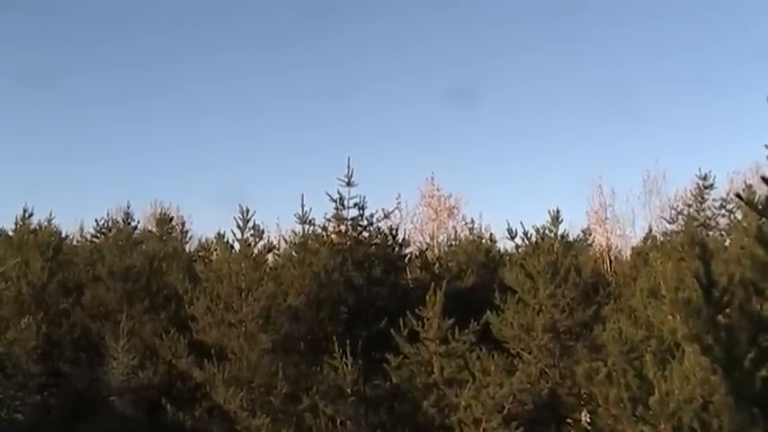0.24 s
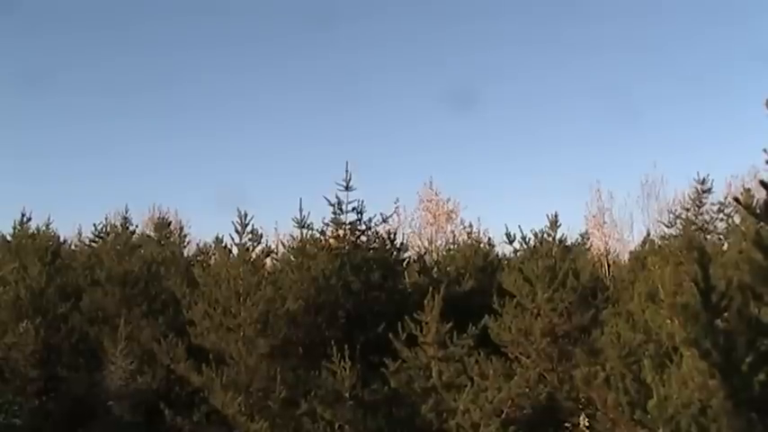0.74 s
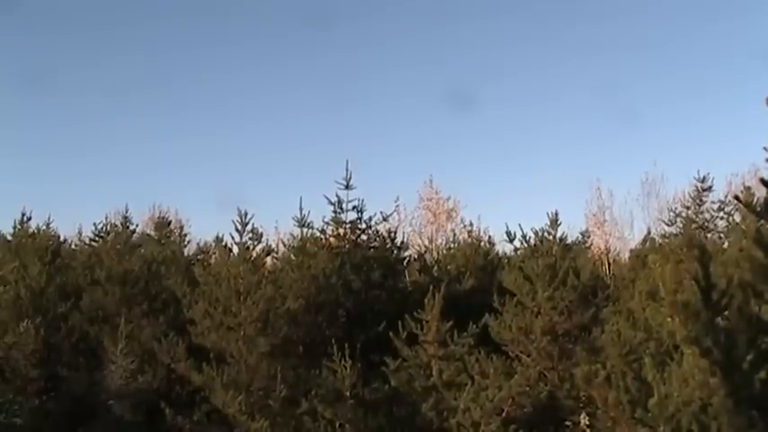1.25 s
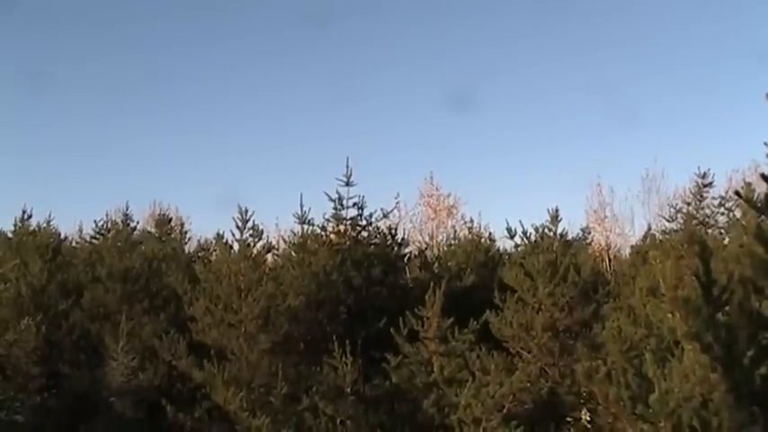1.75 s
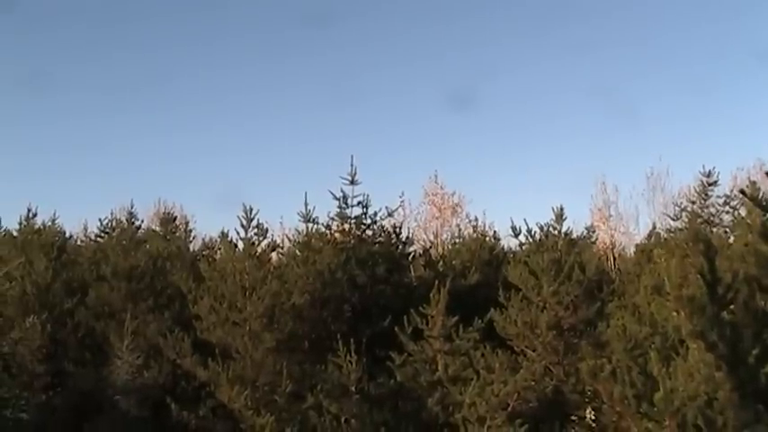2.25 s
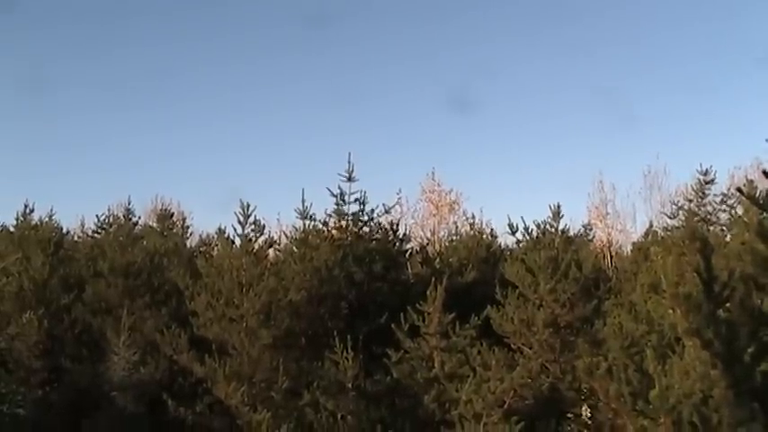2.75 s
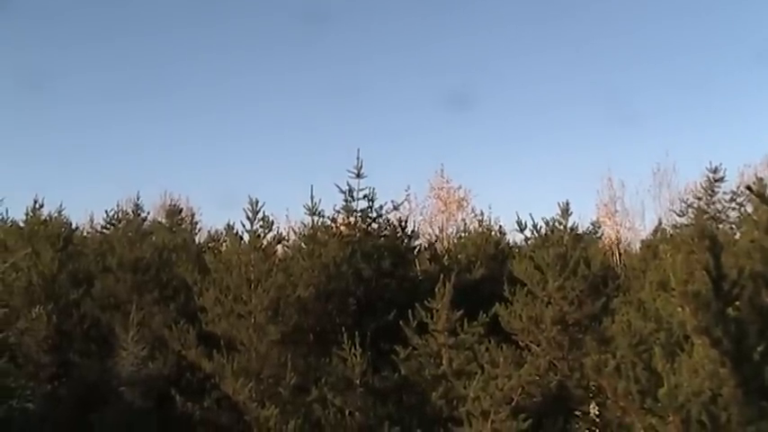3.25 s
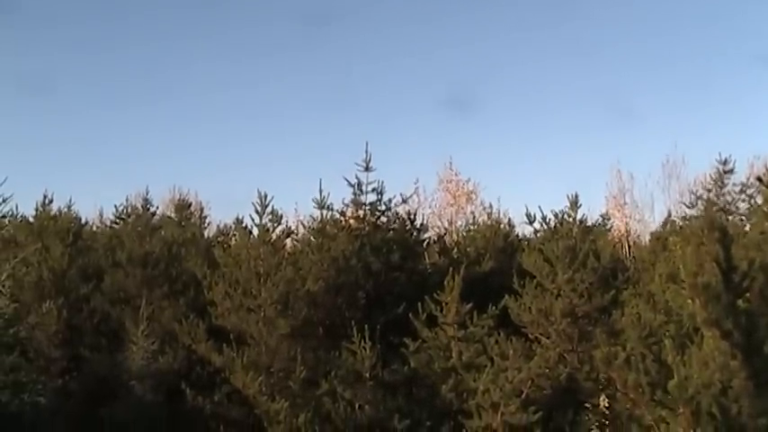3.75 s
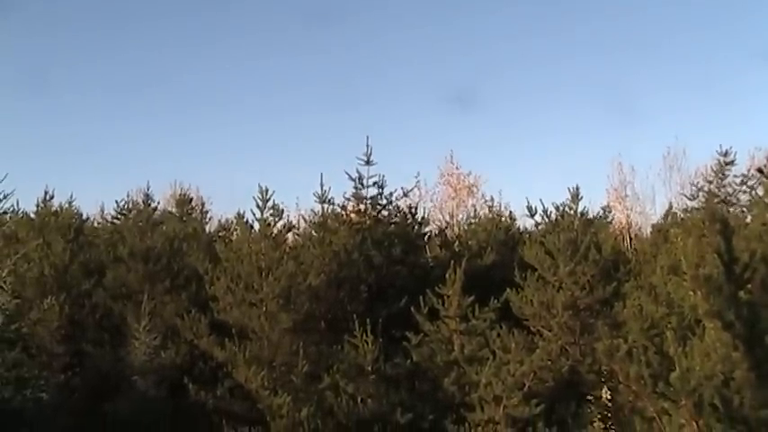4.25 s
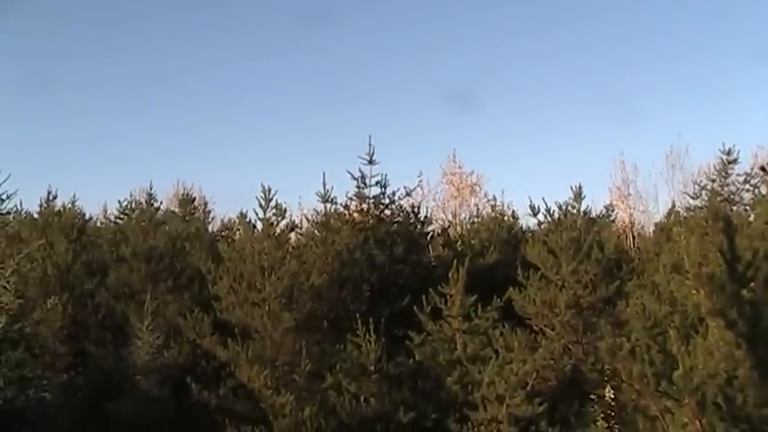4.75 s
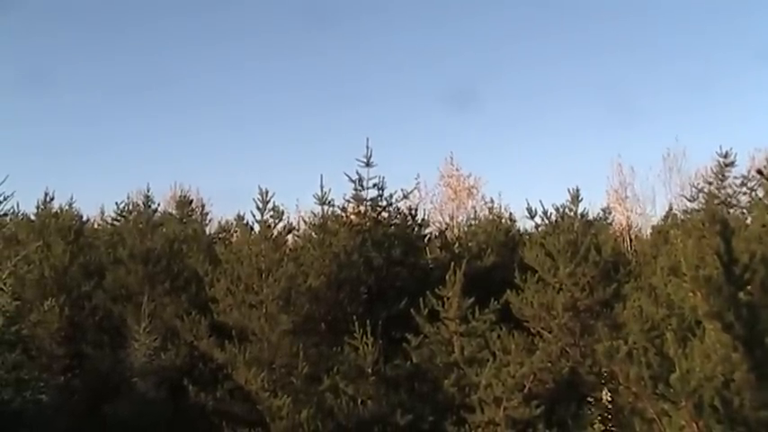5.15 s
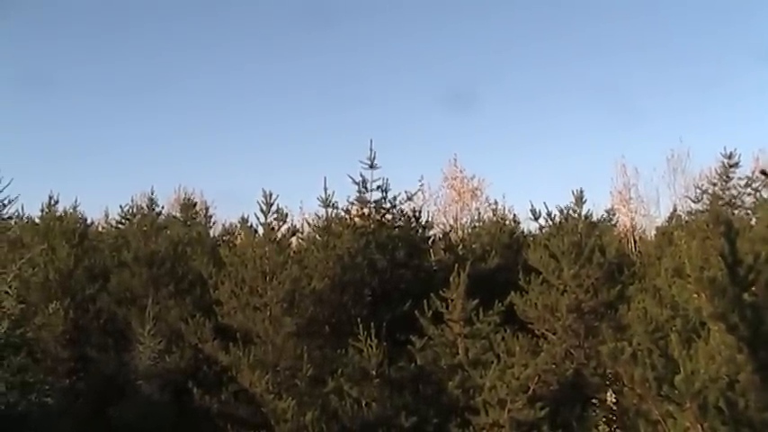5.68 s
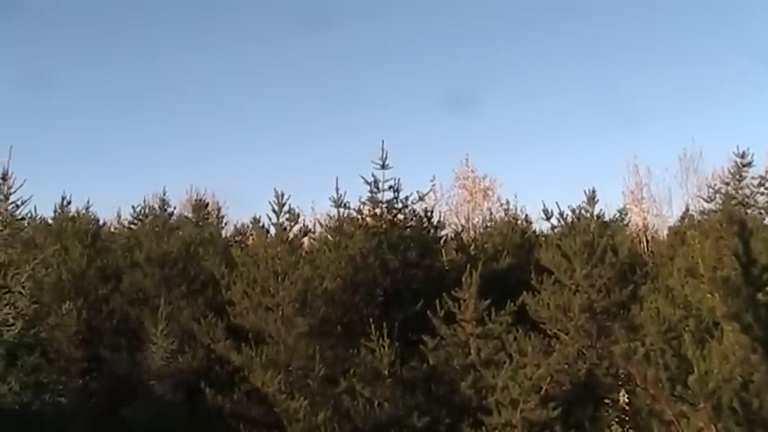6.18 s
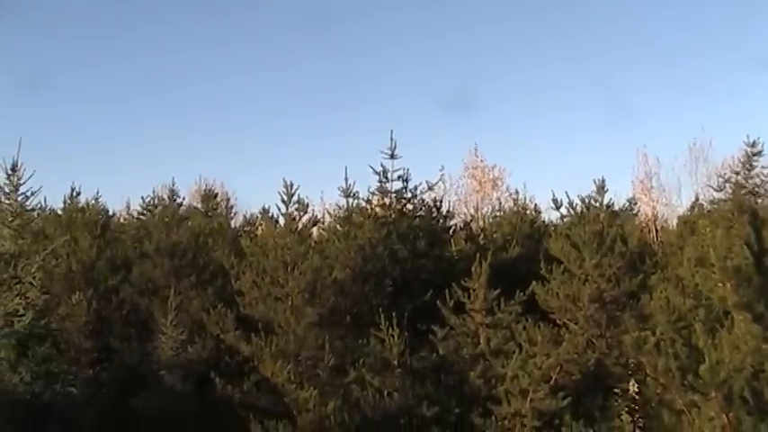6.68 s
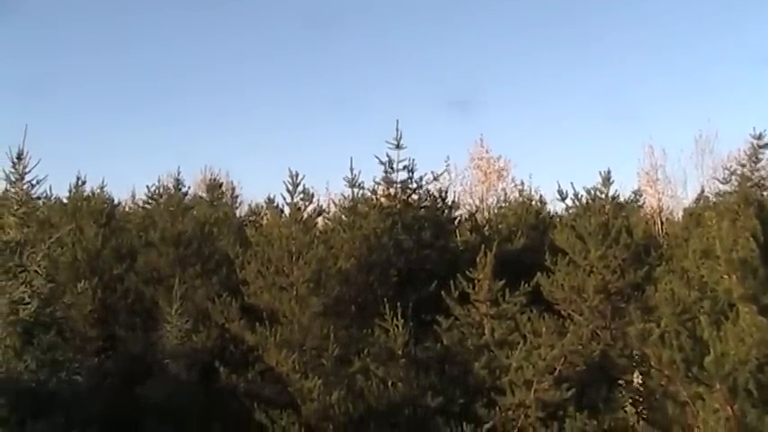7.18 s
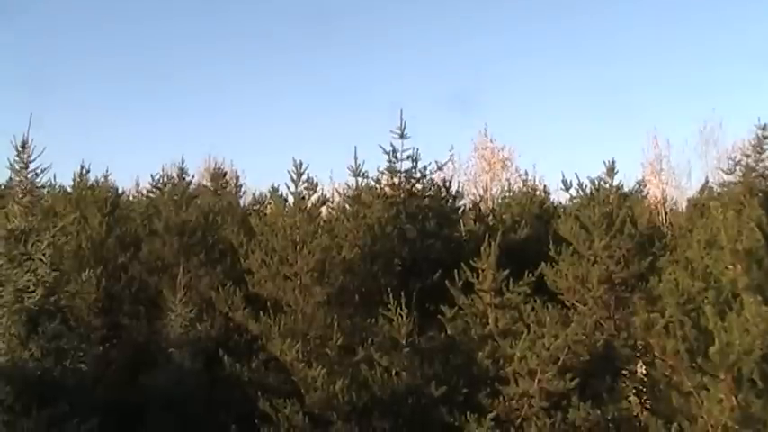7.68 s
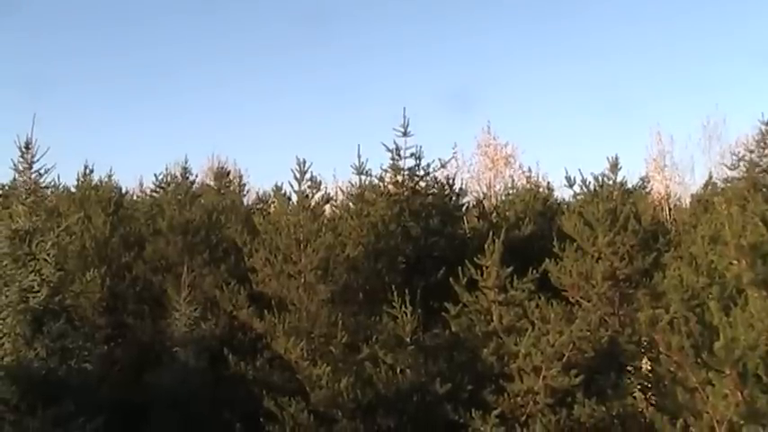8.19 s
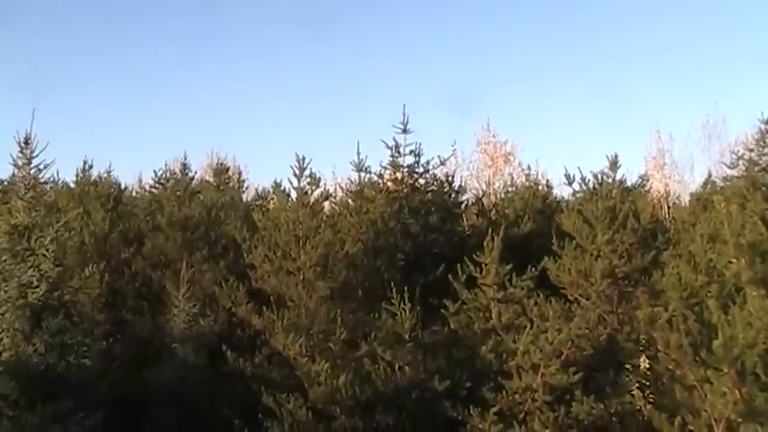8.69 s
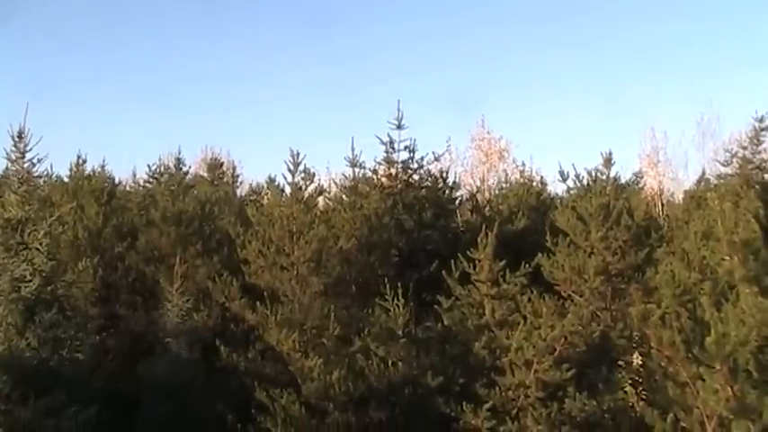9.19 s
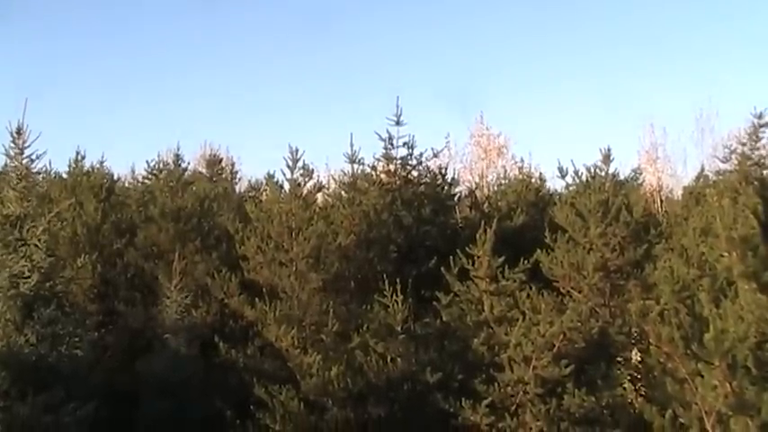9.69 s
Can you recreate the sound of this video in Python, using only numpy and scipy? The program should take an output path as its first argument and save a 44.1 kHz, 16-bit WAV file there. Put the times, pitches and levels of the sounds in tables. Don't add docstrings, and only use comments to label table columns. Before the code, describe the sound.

A distant wolf howls twice from inside a conifer wood, long smooth notes sliding downward, echoing through the trees over soft camera hiss.

```python
import sys
import numpy as np
from scipy import signal
from scipy.fft import rfft, irfft
from scipy.io import wavfile
from scipy.ndimage import uniform_filter1d

SR = 44100
rng = np.random.default_rng(int(sys.argv[2]) if len(sys.argv) > 2 else 0)


def volts(x):
    e = np.asarray(x, float) / 20
    return 10 ** e


def materialize(psi):
    bounded = np.clip(np.atleast_2d(psi).T, -1, 1)
    quanta = np.round(bounded * 32767).astype(np.int16)
    wavfile.write(sys.argv[1], SR, quanta)


N = 437913
LEAD = 4 * SR
FIELD_HZ = 59.94

# time in seconds, pitch in Hz.
FIRST_HZ = [(0.0, 382.8), (0.6, 377.3), (1.26, 375.1), (1.67, 354.2), (1.87, 348.8), (2.1, 340.5),
            (2.36, 322.9), (2.73, 330.5), (2.97, 327)]
# time in seconds, pitch in Hz.
SCOOP_HZ = [
    (5.02, 501.9),
    (5.08, 569.8),
    (5.122, 602.2),
    (5.135, 679.3),
]
# time in seconds, pitch in Hz.
HIGH_HZ = [(5.17, 706.1), (5.22, 693.7), (5.45, 610.2), (5.62, 598.1), (6.14, 558.5), (6.34, 538),
           (6.44, 519), (6.68, 504), (6.79, 479.6)]
# time in seconds, pitch in Hz.
LOW_HZ = [(6.84, 458.2), (6.91, 443.5), (7.12, 424.1), (7.29, 417.3), (7.9, 409.8), (8.68, 396.5),
          (9.02, 364.1), (9.11, 360.5), (9.2, 344.4)]
# time in seconds, pitch in Hz, level in dB re the first effort.
EARLIER = [(-3, 620, -6), (-2.5, 570, -4), (-1.55, 505, 7), (-1.35, 440, 7), (-1, 400, -26),
           (-0.15, 384, 4)]
# time in seconds, effort in dB, mouth opening in dB, nose passage in dB.
FIRST_EFFORT = [(0, -43.5, 0, 1), (.18, -42.5, 0, 3), (.64, -47.5, 3, -6.5), (.76, -45, 2.5, 1.5),
                (1.3, -46.5, 1.5, 0.5), (1.7, -45, -3, 3.5), (2.2, -40, -11, -1), (2.7, -40.5, -10, 0),
                (2.955, -41, -10, -2)]
# time in seconds, effort in dB, mouth opening in dB, nose passage in dB.
HIGH_EFFORT = [(5.02, -52, -20, 19), (5.11, -36.5, -20.5, 7), (5.15, -49.5, 0, 1.5), (5.4, -41.5, -3.5, 1),
               (5.72, -46, -2.5, 1.5), (5.95, -39.5, -3, -4), (6.17, -42.5, -2, 0.5), (6.5, -38, -3.5, -5),
               (6.8, -37, -6.5, 1)]
# time in seconds, effort in dB, mouth opening in dB, nose passage in dB.
LOW_EFFORT = [(7.0, -37, -6.5, -0.5), (7.3, -35, -6, -4), (7.6, -35.5, -5.5, -3), (8.0, -39, -2.5, -0.5),
              (8.25, -34, -5, -4), (8.55, -38.5, -1.5, -7), (8.75, -37, -4.5, -5.5),
              (8.95, -46, -0.5, -0.5), (9.2, -43, -10, 6.5)]
FOLDS_DB = [
    [0, 3, 0, -12],
    [0, 1.4, 0.69, -12.5],
]
# frequency in Hz, gain in dB.
THROAT = [(320, -0.5), (420, 1), (650, -1), (950, -2.5), (1170, 4.5), (1400, -5.5), (1700, -11),
          (2000, -28)]
# frequency in Hz, level in dB re overtone 1.
MOUTH = [(1400, -40), (1660, -33), (1850, -44), (2120, -44), (2240, -26), (2300, -19), (2420, -21),
         (2520, -28), (2800, -45), (4000, -80)]
# dB per dB of mouth opening, overtones 1 to 4.
OPENING = [0.16, 1.13, 1.91, 0.92]
# dB per dB of nose passage, overtones 1 to 4.
NOSE = [0, 1, 0, 0]
# gain in dB, overtones 1 to 4.
CHEST_DB = [0.5, -13, 29.5, 2]
# gain in dB, overtones 1 to 4.
END_FADE_DB = [-45, -22, -27, -12]
# frequency in Hz, t60 in seconds, level in dB.
TRUNKS = [(250, 0.51, -16), (455, 1, -19), (770, 0.33, -3), (1170, 0.33, -10), (1296, 0.43, -6),
          (1820, 0.33, -8), (2620, 0.94, -10)]
# frequency in Hz, t60 in seconds, level in dB.
TREE_LINE = [(250, 2.4, -22), (450, 0.47, -27), (695, 3, -13), (1290, 0.74, -13), (1300, 1.6, -7),
             (1690, 0.75, -12.5), (2600, 0.59, -5)]
# frequency in Hz, t60 in seconds, level in dB.
FOREST = [(250, 5.0, -21), (330, 5.0, -19), (386, 8, -15.5), (510, 6.2, -18.5), (746, 5.3, -19),
          (1150, 3.3, -25), (1700, 1.9, -31), (2600, 2.4, -20)]
# frequency in Hz, gain in dB.
OFF_AXIS = [(300, -29), (800, -23), (1150, -20.5), (1500, -21), (2500, -26)]
# time in seconds, peak in dB, snap level in dB.
TICKS = [
    (1.3085, -48.5, -24),
    (3.46, -46, -7.5),
    (7.2982, -49, -16),
]
# frequency in Hz, t60 in seconds, middle level in dB, side level in dB.
CASE = [(1820, 0.0091, 10, -8), (1970, 0.019, 2, 3), (2320, 0.0072, -7, -5), (2820, .006, -15, -2),
        (3060, 0.015, -0.5, 10), (3540, 0.014, -4, 3), (4360, 0.0084, -8, -14)]
# frequency in Hz, density in dB per Hz.
MIDDLE_HISS = [(20, -19), (45, -16), (65, -10.5), (110, -3), (200, -3), (400, -4.5), (800, -12.5),
               (1600, -16), (3200, -22.5), (7000, -27.5), (12000, -31.5), (15600, -35.5)]
# frequency in Hz, density in dB per Hz.
SIDE_HISS = [(18, -70), (40, -24), (60, -25), (150, -6.5), (230, -3.5), (420, -3), (600, -4.5),
             (1500, -10.5), (3600, -18), (9000, -28.5), (15600, -37.5)]
# time in seconds, gain in dB.
DRIFT = [(0, 0.5), (1.5, 0), (3.0, 1.1), (4.0, -0.24), (5.2, -0.6), (6.3, 0.65), (8.0, 0.34), (9.93, 0.5)]
# multiple of the field rate, rms level in dB.
HUM = [(1, -71), (1.5, -71), (2, -72), (3, -75.5), (4, -93)]


def evened(x):
    return x / np.sqrt(np.mean(x ** 2) + 1e-20)


def read(points, hz, column=1):
    table = np.transpose(points)
    return np.interp(np.log(hz + 1), np.log(table[0] + 1), table[column])


def wander(size, smooth_s):
    span = int(smooth_s * SR / 32) + 1
    coarse = rng.standard_normal(size // 32 + 2)
    coarse = uniform_filter1d(uniform_filter1d(coarse, span), span)
    return np.interp(np.arange(size) / 32, np.arange(len(coarse)), evened(coarse))


def howl(tune, rows, folds_db, bright_db, earlier=()):
    end_s, sag_per_s = .15, 1.85
    still_db, swing_db, swing_per_s = -5.5, 11, .12
    end_turn_db = -9
    last, last_hz = tune[-1]
    ending = [(last + end_s, last_hz * (1 - sag_per_s * end_s))]
    tune = [(s, hz) for s, hz, db in earlier] + tune + ending
    rows = [(s, rows[0][1] + db, *rows[0][2:]) for s, hz, db in earlier] + rows
    s, *controls = np.transpose(rows)
    t = (np.arange(N + LEAD) - LEAD) / SR

    steady_hz = uniform_filter1d(np.interp(t, *np.transpose(tune)), size=500)
    pitch_hz = steady_hz * (1 + .0008 * wander(len(t), .02))
    phase = 2 * np.pi * np.cumsum(pitch_hz) / SR

    effort_db, mouth_db, nose_db = (np.interp(t, s, db) for db in controls)
    dying = np.clip((t - last) / end_s, 0, 1) ** 1.5
    scoop_s, break_s, high_s = SCOOP_HZ[0][0], SCOOP_HZ[-2][0], SCOOP_HZ[-1][0]
    chest = np.interp(t, [scoop_s - 1, scoop_s, break_s, high_s], [0, 1, 1, 0])
    levels_db = []
    for k, fold_db in enumerate(folds_db):
        level_db = effort_db + fold_db + OPENING[k] * mouth_db + NOSE[k] * nose_db
        level_db = level_db + CHEST_DB[k] * chest + END_FADE_DB[k] * dying
        levels_db.append(level_db + read(THROAT, (k + 1) * pitch_hz))
    levels_db[2] = np.maximum(levels_db[2], levels_db[0] - 31)
    for k in (5, 6):
        colour_db = read(MOUTH, k * pitch_hz) + bright_db
        levels_db.append(levels_db[0] + colour_db + 3.5 * wander(len(t), .04))

    voice = np.zeros(len(t))
    for k, level_db in enumerate(levels_db):
        flutter_db = .7 * wander(len(t), .025)
        voice += volts(level_db + flutter_db) * np.sin((k + 1) * phase + k)
    voice *= np.sqrt(2) * np.clip(np.minimum(t - s[0], last + end_s - t) / 0.012, 0, 1)

    slide_per_s = uniform_filter1d(abs(np.gradient(np.log(steady_hz))) * SR, size=9000)
    aim_db = still_db + swing_db * slide_per_s / (slide_per_s + swing_per_s)
    aim_db += end_turn_db * np.sqrt(dying)
    return voice * np.array([np.ones(len(t)), volts(aim_db)])


def echoes(table, wait_s, rise_s):
    hz, t, z = signal.stft(rng.standard_normal(LEAD), SR, nperseg=512)
    decay = volts(-60 * t / read(table, hz)[:, None])
    shape = decay * (1 - np.exp(-np.maximum(t - wait_s, 0) / rise_s))
    shape /= np.sqrt((shape ** 2).mean(axis=1, keepdims=True) * LEAD)
    level = volts(read(table, hz, column=2))[:, None]
    return signal.istft(z * shape * level, SR, nperseg=512)[1]


def wolf():
    first = howl(FIRST_HZ, FIRST_EFFORT, FOLDS_DB[0], 0, EARLIER)
    second = howl(SCOOP_HZ + HIGH_HZ + LOW_HZ, HIGH_EFFORT + LOW_EFFORT, FOLDS_DB[1], -16)
    direct, aimed = first + second

    near_tail = echoes(TRUNKS, 0.017, 0.016) + echoes(TREE_LINE, .12, 0.058)
    near = signal.fftconvolve(aimed, near_tail)
    at = np.arange(len(direct))
    stirred = np.interp(at - .0009 * SR * wander(len(direct), .05), at, direct)
    far = signal.fftconvolve(stirred, echoes(FOREST, .35, .6))

    middle = direct[LEAD:] + (near + far)[LEAD:LEAD + N]
    off_axis = volts(read(OFF_AXIS, np.fft.rfftfreq(N, 1 / SR)))
    side = irfft(rfft(middle) * np.exp(1j * 1.25) * off_axis, N)
    return np.array([middle, side])


def ticks():
    out, t = np.zeros((2, N)), np.arange(3000) / SR
    for s, peak_db, snap_db in TICKS:
        sweep = np.sin(2 * np.pi * (8500 * t - 2050000.0 * t ** 2))
        snap = volts(snap_db) * sweep * np.exp(-((t - .0007) / 0.00037) ** 2)
        ring = np.zeros((2, len(t)))
        for k, (hz, t60_s, mid_db, side_db) in enumerate(CASE):
            decay = volts([[mid_db], [side_db]] - 60 * t / t60_s)
            ring += decay * np.sin(2 * np.pi * hz * t + [[0], [k + 1.4]])
        ring *= 1 - np.exp(-(t / .0017) ** 2)
        at = round((s - .0008) * SR)
        out[:, at:at + len(t)] += volts(peak_db + 9.5) * (ring + snap * [[1], [.6]])
    return out


def hiss():
    middle_db, side_db = -55.5, -49
    hz, t = np.fft.rfftfreq(N, 1 / SR), np.arange(N) / SR
    colour = volts(np.array([read(MIDDLE_HISS, hz), read(SIDE_HISS, hz)]))
    noise = irfft(rfft(rng.standard_normal((2, N))) * colour, N)
    noise = np.array([evened(row) for row in noise]) * volts([[middle_db], [side_db]])
    kick = np.exp(-.5 * ((t * FIELD_HZ % 1 - .46) / 0.032) ** 2)
    noise *= (1 + .17 * kick) * volts(np.interp(t, *np.transpose(DRIFT)))
    for k, db in HUM:
        level = np.sqrt(2) * volts(db + 1.9 * wander(N, 0.16))
        noise[0] += level * np.sin(2 * np.pi * k * FIELD_HZ * t + k)
    return noise


def scene():
    middle, side = wolf() + ticks() + hiss()
    return np.array([middle + side, middle - side])


def band_limit(x):
    return signal.sosfilt(signal.butter(12, 15730, fs=SR, output="sos"), x)


def record(dry):
    return band_limit(dry)


dry = scene()
out = record(dry)
materialize(out)
```